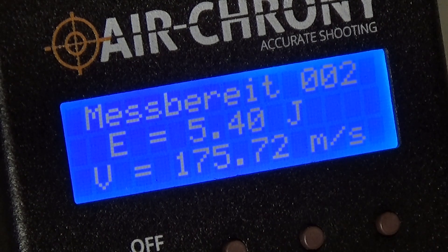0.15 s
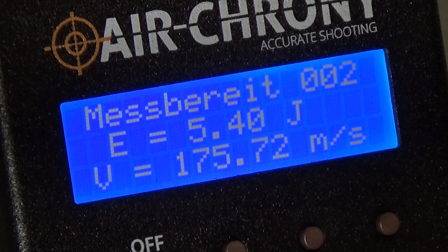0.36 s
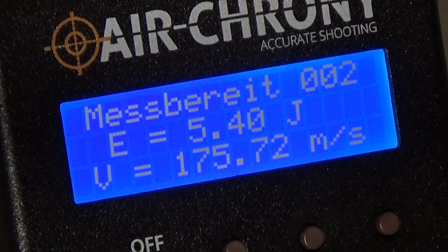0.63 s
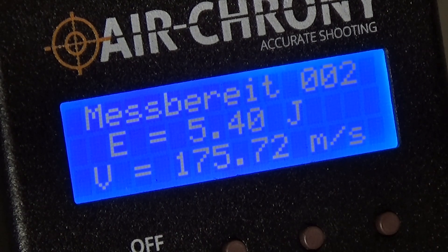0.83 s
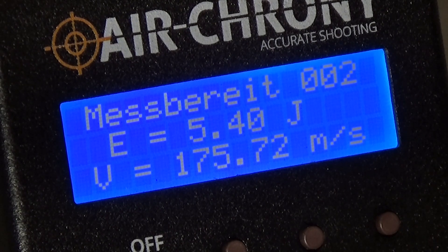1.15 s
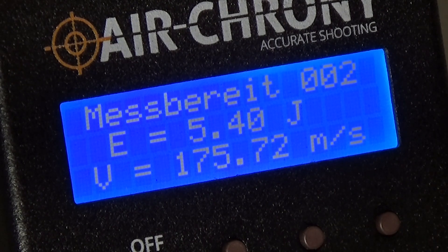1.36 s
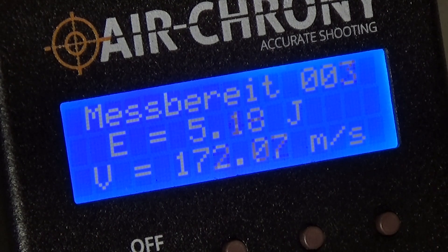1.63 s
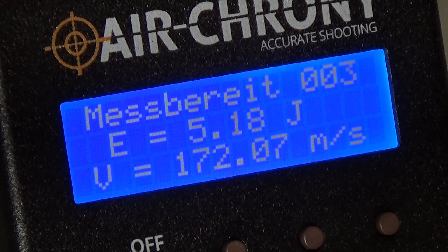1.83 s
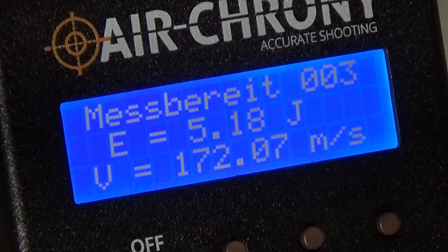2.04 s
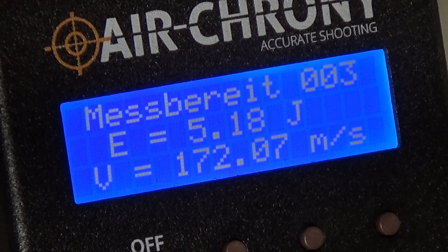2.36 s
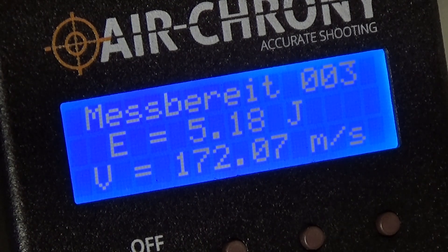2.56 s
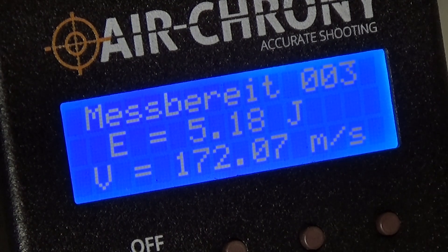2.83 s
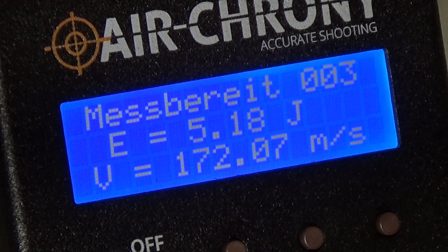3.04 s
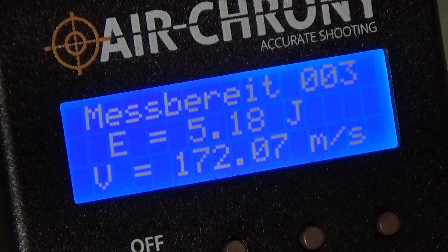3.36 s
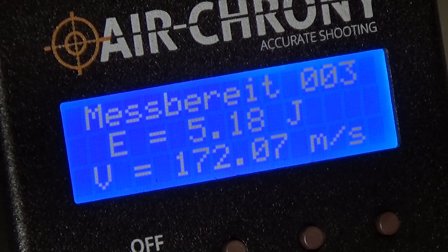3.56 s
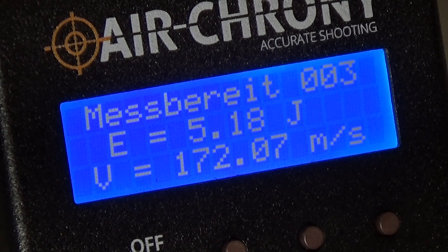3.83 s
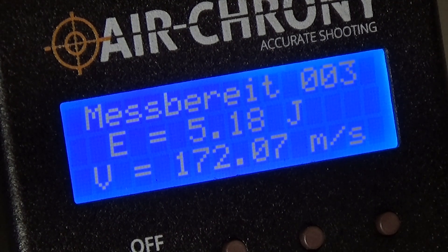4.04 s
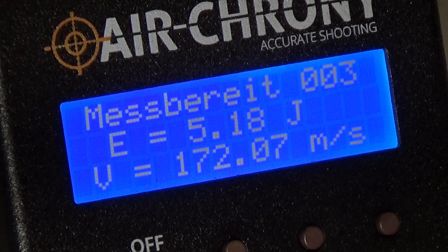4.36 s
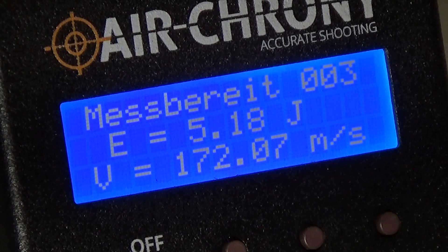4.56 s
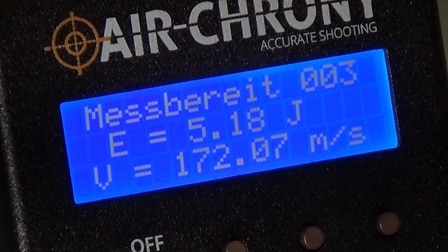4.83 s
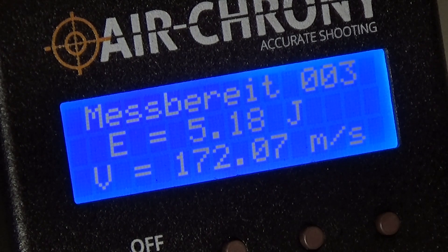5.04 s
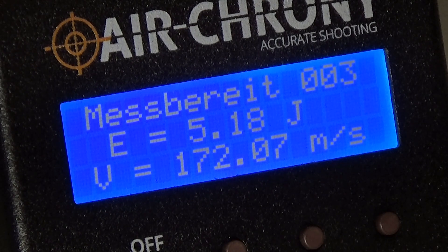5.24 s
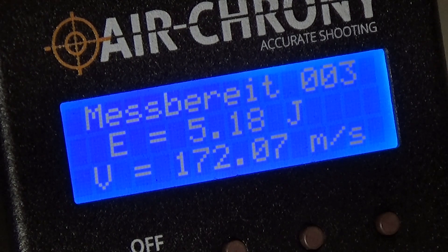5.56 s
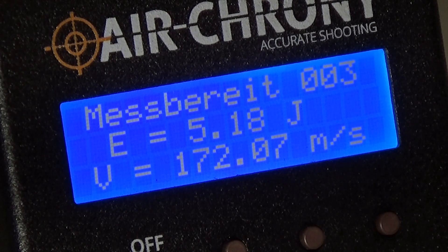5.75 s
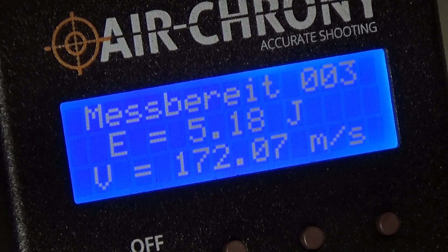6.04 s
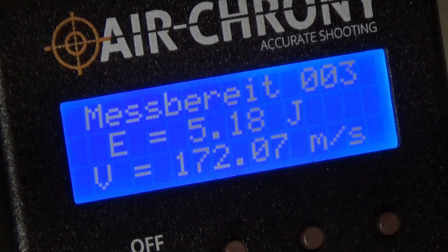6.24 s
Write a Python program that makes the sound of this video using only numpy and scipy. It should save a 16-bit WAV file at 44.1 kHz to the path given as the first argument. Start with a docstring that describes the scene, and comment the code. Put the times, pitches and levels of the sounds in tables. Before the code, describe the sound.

A faint hiss fills a small room, heard from close by an air rifle. At the very start the stock gives a few soft wooden knocks, with light handling taps until about 0.9 seconds. At 1.4 seconds the rifle fires once, by far the loudest sound: a sharp, bright burst of air with a brief barrel ring and a short room echo. From 2.0 to 2.2 seconds the lever swings open with steel clacks and a chattering catch. It shuts between 2.55 and 2.8 seconds with more clacks and dull wooden thuds. Around 2.9 to 3.4 seconds the stock rocks on its wooden rest, the knocks getting quicker and softer. After a pause, a sleeve rustles faintly from about 4.5 seconds to the end near 6.4 seconds, with small ticks around 5.15 and 6 seconds, while the hiss rises slightly.

```python
"""A small room, where a lever-action air rifle is fired once, close to the microphone, over a faint hiss.
Escaping air makes the report and sets the barrel ringing; the room reverberates and a limiter flattens
the peak. The lever swings open and shut with steel clacks and a chattering catch, the stock rocks to a
standstill on its wooden rest, and a sleeve rustles by friction as the rifle is aimed again."""
import sys
import numpy as np
from scipy import signal
from scipy.fft import rfft, irfft
from scipy.io import wavfile
from scipy.ndimage import uniform_filter1d

SR = 44100
rng = np.random.default_rng(int(sys.argv[2]) if len(sys.argv) > 2 else 0)


def generate_wav(signal):
    """Clip the signal to [-1, 1] and save it as 16-bit WAV at the path in sys.argv[1]."""
    frames = np.transpose(np.atleast_2d(signal))
    scaled = np.clip(frames, -1, 1) * 32767
    pcm = np.round(scaled).astype(np.int16)
    wavfile.write(sys.argv[1], SR, pcm)


N = 282240
AGE = np.arange(SR) / SR   # seconds since a blow

# Levels in the tables are relative; spectra give level per unit bandwidth.
# background hiss over time: time_s, level_db
HISS_LEVEL = [(0, -53.5), (3.8, -53), (5.0, -49), (6.4, -47.5)]
# spectrum of the hiss: frequency_hz, level_db
HISS_SPECTRUM = [(25, -32.5), (60, -11), (110, -6.5), (230, 0.5), (400, 2.5), (650, 2), (1000, 0),
                 (2400, -3.5), (7000, -7), (15500, -10.5)]
# stereo width of the hiss (first table) and of all other noise (second table): frequency_hz, side_minus_mid_db
HISS_WIDTH = [(60, -7), (110, -9), (200, -10.5), (380, -4.5), (700, -1), (1290, 0.5), (2380, -1),
              (4400, -6), (8120, -11), (15000, -49)]
SOURCE_WIDTH = [(60, -14), (150, -22), (400, -17), (700, -14.5), (1300, -11), (2400, -10), (4400, -7.5),
                (8000, -11), (11000, -18), (15000, -24)]
# reverberation time of the room: frequency_hz, t60_s
ROOM_T60 = [(80, 0.43), (200, 0.98), (500, 0.64), (1200, 0.56), (3500, 0.58), (7000, 0.46), (11000, 0.22),
            (15000, 0.094)]
# colour of the reverberation, with one booming low mode: frequency_hz, gain_db
ROOM_COLOUR = [(60, -5), (160, -14), (205, 6.5), (280, -0.5), (500, -4.5), (2000, -2), (7000, -3.5),
               (15000, 6.5)]

# the sleeve sliding on the stock: start_s, length_s, level_db
SLEEVE_SLIDES = [(2.52, 0.11, -46.5), (4.44, 0.12, -53), (4.618, 0.027, -47), (4.758, 0.79, -46),
                 (5.46, 0.62, -46.5), (5.877, 0.6, -46.5), (5.957, 0.028, -47)]
# spectrum of cloth friction: frequency_hz, level_db
CLOTH_SPECTRUM = [(300, -15), (1500, -6), (4000, -5.5), (6500, -5.5), (8500, 0.5), (10500, 3), (12500, 0),
                  (15500, -6.5)]

# stock and hands striking the rest: start_s, level_db, cutoff_hz, t60_s
WOOD_KNOCKS = [(0.002, -25.5, 1430, 0.31), (.0215, -23.5, 1430, 0.39), (.075, -26.5, 1200, 0.28),
               (.495, -45, 880, 0.085), (.5585, -42, 830, 0.039), (.8551, -37.5, 815, 0.039),
               (1.958, -39.5, 1210, .088), (2.015, -27, 1060, 0.058), (2.112, -26, 1820, 0.062),
               (2.153, -23, 820, 0.049), (2.586, -19, 2900, 0.057), (2.6982, -11, 2090, 0.35),
               (2.745, -9.5, 1850, .099), (2.888, -7, 860, 0.075), (2.957, -23.5, 1070, 0.22),
               (3.066, -13.5, 1780, 0.029), (5.15, -37, 2050, 0.074), (5.7327, -44, 1300, 0.22),
               (5.9848, -40.5, 1256, 0.042)]
# runs of light taps as the hands settle: start_s, end_s, first_level_db, last_level_db
SETTLING_TAPS = [(0.257, 0.802, -54, -56), (3.218, 3.36, -34, -54)]
# spectrum of a blow on wood: frequency_hz, level_db
WOOD_SPECTRUM = [(30, -31), (100, -22), (200, -18), (330, -10.5), (480, -4.5), (700, 1.5), (1150, -2.5),
                 (1700, -4), (4000, -10.5), (16000, -16.5)]
# modes of the stock and rest: pitch_hz, level_db, t60_s
WOOD_MODES = [(375, -13, .12), (580, -12, .12), (675, -5.5, .16), (770, -6, .15), (900, -9, .12),
              (1110, -4, .14), (1390, -17, .09), (1560, -15, .09)]

# snaps of the sprung catch: start_s, level_db, tilt_db_per_octave, loss_per_bounce_db
CATCH_SNAPS = [(2.138, -11, 1.5, 9.5), (2.198, -10.5, 2, 2), (2.562, -21.5, -0.5, 4), (2.584, -9.5, 1, 3),
               (5.1492, -40.5, -12.5, 5.5)]
# impacts of trigger, lever and linkage: start_s, level_db, tilt_db_per_octave, t60_s
LEVER_CLACKS = [(0.001, -31.5, -6.5, 0.29), (.128, -34, -7, 0.093), (1.417, -38, 1.5, .1),
                (1.426, -21, -7, .02), (1.9547, -29.5, 3, 0.054), (2.0098, -27, -0.5, .091),
                (2.0318, -15, 2, 0.13), (2.078, -23.5, 2.5, 0.38), (2.72, -20, -1.5, 0.37),
                (2.7589, -14, 2, 0.19), (3.019, -36, 0.5, 0.052), (5.9842, -41.5, -1.5, 0.056)]
# rattle spectra of the catch and the lever: frequency_hz, level_db
CATCH_SPECTRUM = [(60, -59), (220, -34), (450, -0.5), (1200, 2.5), (2200, 11), (3200, 6), (5000, 4),
                  (6500, -2.5), (8200, 4), (9700, 5), (11500, 4), (13400, 9), (15500, -13)]
LEVER_SPECTRUM = [(60, -45.5), (220, -37), (450, 9), (1000, 5.5), (1700, 11), (2700, 4.5), (4100, 7.5),
                  (6700, -1.5), (8400, 2.5), (9800, 3), (11200, 7), (13000, 3), (15500, -3)]
# modes of the catch and the lever: pitch_hz, level_db, t60_s
CATCH_MODES = [(2030, -15, 0.12), (2330, -25.5, 0.16), (3660, -13, 0.12), (5390, -11.5, 0.22),
               (9700, 1.5, 0.15), (11000, -3, 0.1), (13700, -12, 0.17), (13500, -26, 0.14)]
LEVER_MODES = [(900, -13, .08), (3350, -17, .07), (4130, -16, .1), (8280, -17, .1), (11060, -11, .19),
               (11150, -10.5, .22), (12279, -19, .15), (14000, -16, .14)]

# spectrum of the air blast: frequency_hz, level_db
BLAST_SPECTRUM = [(60, -19), (130, -8.5), (205, -7.5), (300, -13), (450, 2.5), (650, -1), (1050, 4.5),
                  (2000, 4), (3000, 1.5), (4500, 6.5), (7000, 6.5), (9500, 11.5), (12700, 13.5),
                  (16000, -4.5)]
# modes of the barrel and action: pitch_hz, level_db, t60_s
BARREL_MODES = [(985, -18, .46), (1620, -18, .46), (4527, -16.5, .58), (5060, -22, .45), (5706, -23, .42),
                (8490, -14, .4), (9179, -11.5, .35), (12480, -8, .3), (12690, -6.5, .32)]


def from_db(db):
    """Amplitude grows tenfold for every 20 dB."""
    return 10 ** (np.asarray(db) / 20)


def at_hz(table, hz):
    """Interpolation on a logarithmic frequency axis."""
    frequencies, values = np.transpose(table)
    return np.interp(np.log(np.maximum(hz, 1)), np.log(frequencies), values)


def decay(t60):
    """Exponential damping: 60 dB are lost in t60 seconds."""
    return from_db(-60 * AGE / t60)


def add(out, start_s, sound):
    """Superposition: a sound adds to the mix from start_s on."""
    start = round(start_s * SR)
    out[:, start:start + len(AGE)] += sound[..., :N - start]


def noise(colour=np.zeros_like, size=len(AGE), width=SOURCE_WIDTH):
    """Gaussian stereo noise of rms 1, with the spectrum colour(hz) in dB; white by default."""
    hz = np.fft.rfftfreq(size, 1 / SR)
    mid, side = rfft(rng.standard_normal((2, size))) * from_db(colour(hz))
    side = side * from_db(at_hz(width, hz))
    return unit_rms(irfft([mid + side, mid - side], size))


def unit_rms(x):
    """Normalisation to a mean power of 1."""
    return x / np.sqrt(np.mean(x ** 2) + 1e-20)


def coloured(x, colour):
    """Minimum-phase filtering: folding the cepstrum makes the gain colour(hz), in dB, causal."""
    size = x.shape[-1]
    log_gain = np.log(from_db(colour(np.fft.rfftfreq(size, 1 / SR))))
    cepstrum = irfft(log_gain, size)
    cepstrum[1:size // 2] *= 2
    cepstrum[size // 2 + 1:] = 0
    return irfft(rfft(x) * np.exp(rfft(cepstrum, size)), size)


def cluster(hz, width_hz, count=9):
    """Beating: closely spaced partials drift in and out of phase; rms about 1."""
    partials_hz = hz + width_hz * (np.arange(count) + rng.random(count) - count / 2) / count
    cycles = partials_hz[:, None] * AGE + rng.random((count, 1))
    return np.sin(2 * np.pi * cycles).sum(axis=0) * np.sqrt(2 / count)


def ringing(modes, gain_db, width_hz):
    """Free vibration: each cluster of modes decays at its own rate."""
    return sum(from_db(db + gain_db(hz)) * cluster(hz, width_hz) * decay(t60) for hz, db, t60 in modes)


def blow(colour, t60, ring, rise_s):
    """Modal overlap: crowded modes merge into a noise burst, while the clearer ones ring on."""
    rise = 1 - np.exp(-AGE / rise_s)
    envelope = rise * decay(t60)
    burst = unit_rms(coloured(noise() * envelope, colour)) * np.sqrt(np.mean(envelope ** 2))
    return burst + ring * rise ** 2


def bounce_times(start_s, gap_s, ratio, count):
    """Geometric progression: each gap between contacts is a fixed multiple of the last."""
    return start_s + np.append(0, np.cumsum(gap_s * ratio ** np.arange(count - 1)))


def rebound_level(db, loss_db, hard_blow_db=-25, sticking=0.99):
    """Restitution: hard blows spring back, while soft ones lose more and nearly stick."""
    return db - loss_db - sticking * max(hard_blow_db - db, 0)


def hiss():
    """Broadband noise forms a faint floor that rises towards the end."""
    level_db = np.interp(np.arange(N) / SR, *np.transpose(HISS_LEVEL))
    return from_db(level_db) * noise(lambda hz: at_hz(HISS_SPECTRUM, hz), size=N, width=HISS_WIDTH)


def room(x, build_s=0.0087):
    """Reverberation: diffuse reflections build up quickly and die soonest in the treble."""
    white, tail = noise(), 0
    edges_hz = np.geomspace(50, 18000, 15)
    for low, high in zip(edges_hz, edges_hz[1:]):
        band = signal.sosfilt(signal.butter(2, [low, high], "band", fs=SR, output="sos"), white)
        tail = tail + band * decay(at_hz(ROOM_T60, np.sqrt(low * high)))
        white = noise()
    tail = coloured(tail * (1 - np.exp(-AGE / build_s)), lambda hz: at_hz(ROOM_COLOUR, hz))
    response = unit_rms(tail) / np.sqrt(len(AGE))
    return signal.fftconvolve(x.mean(axis=0)[None], response, axes=1)[:, :N]


def slide(start_s, length_s, attack_s=0.013, swell_db=3.5, release_t60_s=0.1):
    """Friction noise grows with speed: a slide's envelope peaks in its middle, where it is fastest."""
    age = np.maximum(np.arange(N) / SR - start_s, 0)
    arch_db = swell_db * (np.sin(np.pi * np.minimum(age / length_s, 1)) - 1)
    release_db = -60 * np.maximum(age - length_s, 0) / release_t60_s
    return (1 - np.exp(-age / attack_s)) * from_db(arch_db + release_db)


def sleeve(grain_db=2):
    """Sliding friction: cloth on the stock gives a fine uneven hiss; overlapping slides add in power."""
    grain = unit_rms(uniform_filter1d(rng.standard_normal(N), size=200))
    power = sum((from_db(db) * slide(start, length)) ** 2 for start, length, db in SLEEVE_SLIDES)
    friction = noise(lambda hz: at_hz(CLOTH_SPECTRUM, hz), size=N)
    return np.sqrt(power) * from_db(grain_db * grain) * friction


def rocking(first_db=-8.5, loss_db=1.77, cutoff_hz=1130, t60_s=0.085):
    """Inelastic impacts: the rocking stock strikes its rest ever sooner and more softly."""
    times = bounce_times(start_s=2.992, gap_s=0.08, ratio=0.75, count=5)
    return [(s, first_db - loss_db * k ** 2, cutoff_hz, t60_s) for k, s in enumerate(times)]


def settling_taps(gap_s=0.049, spread_db=5.5, cutoff_hz=770, t60_s=0.19):
    """Random excitation: the settling hands tap lightly, uneven in time and strength."""
    for start, end, first_db, last_db in SETTLING_TAPS:
        for s in np.arange(start, end, gap_s):
            db = np.interp(s, [start, end], [first_db, last_db]) + spread_db * rng.standard_normal()
            yield s + gap_s * (rng.random() - 0.5), db, cutoff_hz, t60_s


def wood_contacts(rebound_s=0.027, rebound_t60_s=0.24):
    """Restitution gives each knock and rocking blow a softer rebound; the light taps have none."""
    for s, db, cutoff_hz, t60 in WOOD_KNOCKS + rocking():
        yield s, db, cutoff_hz, t60
        yield s + rebound_s, rebound_level(db, loss_db=17.5), cutoff_hz, rebound_t60_s
    yield from settling_taps()


def padded_contact(hz, cutoff_hz, bass_db=-14, tick_db=-35):
    """Contact time limits bandwidth: above the cut-off the gain, in dB, falls to a faint tick."""
    bass_shelf = 1 - (1 - from_db(bass_db) ** 2) / (1 + (hz / (0.59 * cutoff_hz)) ** 4)
    roll_off = 1 + (hz / cutoff_hz) ** 9.6
    return 10 * np.log10(bass_shelf / roll_off + from_db(tick_db) ** 2)


def stock(ring_db=-6):
    """Impact excitation: padded blows drive the well-damped modes of the wooden stock and rest."""
    out = np.zeros((2, N))
    for s, db, cutoff_hz, t60 in wood_contacts():
        contact = lambda hz: padded_contact(hz, cutoff_hz)
        ring = ringing(WOOD_MODES, lambda hz: ring_db + contact(hz), width_hz=24.7)
        knock = blow(lambda hz: at_hz(WOOD_SPECTRUM, hz) + contact(hz), t60, ring, rise_s=0.00039)
        add(out, s, from_db(db) * knock)
    return out


def steel(contacts, spectrum, modes, rise_s, width_hz, pivot_hz=8000):
    """Steel parts rattle and ring on impact; a harder contact tilts the spectrum towards the treble."""
    out = np.zeros((2, N))
    for s, db, db_per_octave, t60, ring_db in contacts:
        tilt = lambda hz: db_per_octave * np.log2(np.maximum(hz, 1000) / pivot_hz)
        ring = ringing(modes, lambda hz: ring_db + tilt(hz), width_hz)
        clack = blow(lambda hz: at_hz(spectrum, hz) + tilt(hz), t60, ring, rise_s)
        add(out, s, from_db(db) * clack)
    return out


def catch(t60_s=0.084, loosening=1.29, ring_db=-13, ring_growth_db=2):
    """Contact chatter: the sprung catch bounces ever slower, weaker and less damped."""
    contacts = []
    for start, db, tilt, loss_db in CATCH_SNAPS:
        for k, s in enumerate(bounce_times(start, gap_s=0.0135, ratio=1.35, count=4)):
            t60 = t60_s * loosening ** k
            contacts.append((s, db - k * loss_db, tilt, t60, ring_db + k * ring_growth_db))
    return steel(contacts, CATCH_SPECTRUM, CATCH_MODES, rise_s=0.0031, width_hz=185)


def lever(rebound_s=0.014, pressed_ring_db=-30, free_ring_db=-6):
    """Contact damping: the lever hardly rings while pressed home, and more freely on its one rebound."""
    contacts = []
    for s, db, tilt, t60 in LEVER_CLACKS:
        contacts.append((s, db, tilt, t60, pressed_ring_db))
        contacts.append((s + rebound_s, rebound_level(db, loss_db=3), tilt, t60, free_ring_db))
    return steel(contacts, LEVER_SPECTRUM, LEVER_MODES, rise_s=0.00015, width_hz=92)


def shot(start_s=1.428, blast_db=13.1, ring_db=-6.5, thump_db=2, thump_hz=330, pulse_db=35):
    """Sudden expansion: air bursts out with a thump, rings the barrel and sends a pulse to the room."""
    report, outgoing = np.zeros((2, 2, N))
    colour = lambda hz: at_hz(BLAST_SPECTRUM, hz)
    barrel = ringing(BARREL_MODES, lambda hz: ring_db, width_hz=60)
    blast = blow(colour, t60=0.13, ring=barrel, rise_s=0.0023)
    thump = np.cos(2 * np.pi * thump_hz * AGE) * decay(t60=0.012)
    pulse = coloured(1.0 * (AGE == 0), colour)
    add(report, start_s, from_db(blast_db) * blast + from_db(thump_db) * thump)
    add(outgoing, start_s, from_db(pulse_db) * pulse / np.linalg.norm(pulse))
    return report, outgoing


def scene(handling_to_room_db=-14, left_minus_right_db=-1.2):
    """Direct and reverberant fields add: the muzzle fires into the room; the action is close and drier."""
    report, pulse = shot()
    action = from_db(2.5) * (lever() + catch())
    handling = action + from_db(1) * stock()
    background = hiss()
    reflections = room(pulse + from_db(handling_to_room_db) * handling)
    pan = from_db(left_minus_right_db * np.array([[0.5], [-0.5]]))
    return background + reflections + sleeve() + pan * handling + report


def limiter(x, threshold_db=-10.5, release_db_per_s=170, attack_s=0.00082):
    """Automatic gain control: the gain drops quickly above the threshold and recovers steadily."""
    power = uniform_filter1d(np.mean(x ** 2, axis=0), size=220)
    excess_db = np.maximum(10 * np.log10(np.maximum(power, 1e-12)) - threshold_db, 0)
    recovery_db = release_db_per_s * np.arange(N) / SR
    cut_db = np.maximum.accumulate(excess_db + recovery_db) - recovery_db
    pole = np.exp(-1 / (attack_s * SR))
    return x * from_db(-signal.lfilter([1 - pole], [1, -pole], cut_db))


def record(dry, low_cut_hz=75, top_cut_hz=15900):
    """Finite dynamic range and bandwidth: limiter, bass cut, full-scale clipping and a steep top cut."""
    high_pass = signal.butter(2, low_cut_hz, "high", fs=SR, output="sos")
    low_pass = signal.ellip(10, 0.1, 80, top_cut_hz, fs=SR, output="sos")
    lean = signal.sosfilt(high_pass, limiter(dry))
    return signal.sosfilt(low_pass, np.clip(lean, -1, 1))


dry = scene()
out = record(dry)
generate_wav(out)
```